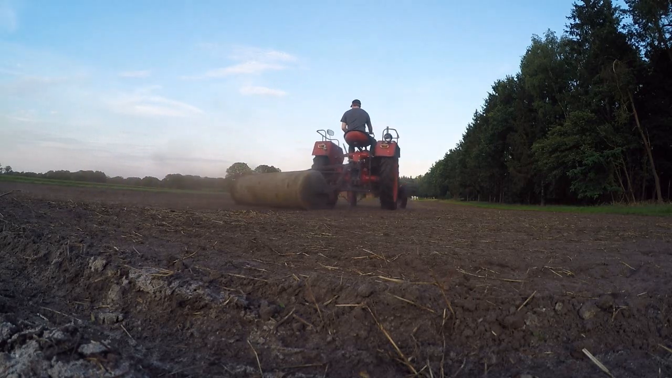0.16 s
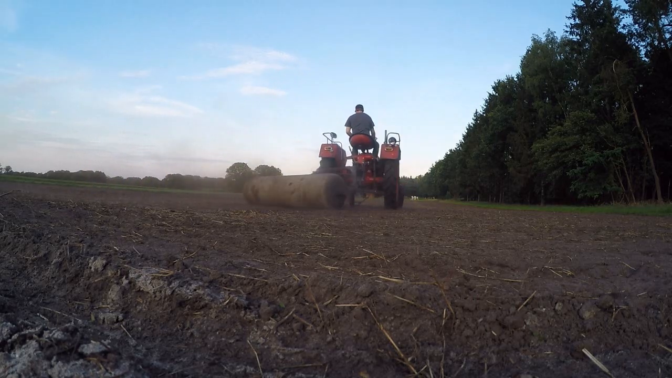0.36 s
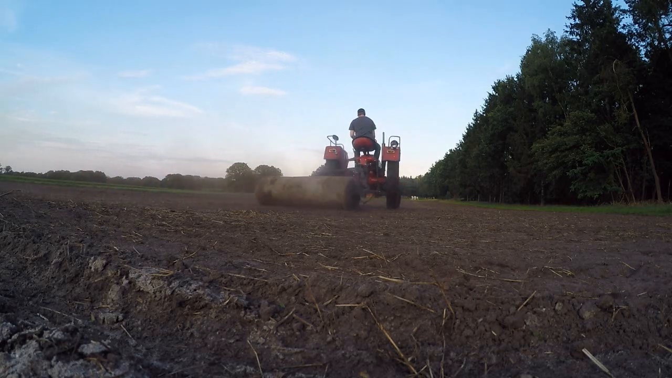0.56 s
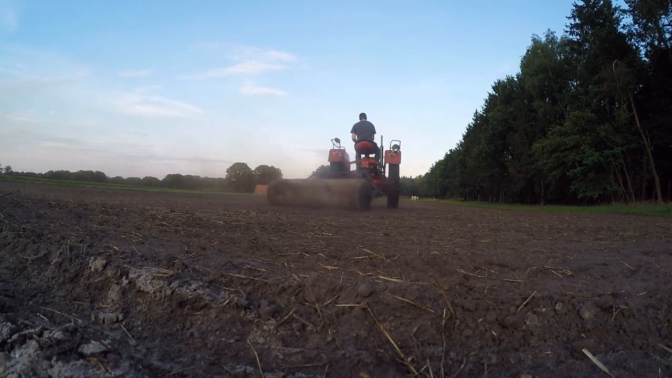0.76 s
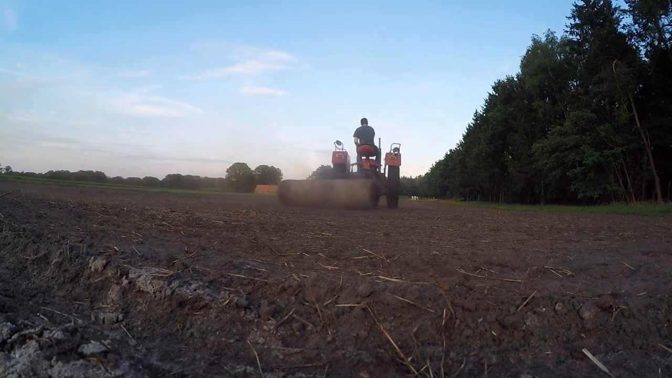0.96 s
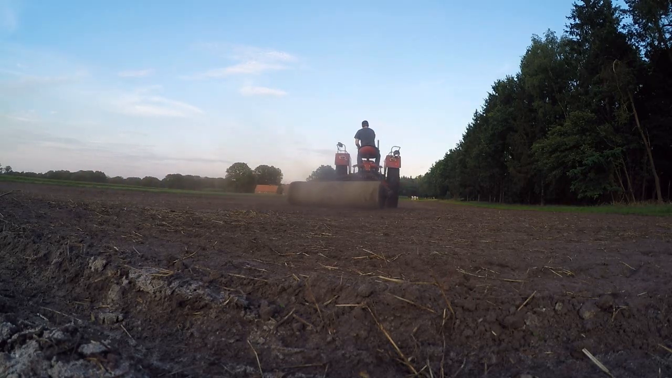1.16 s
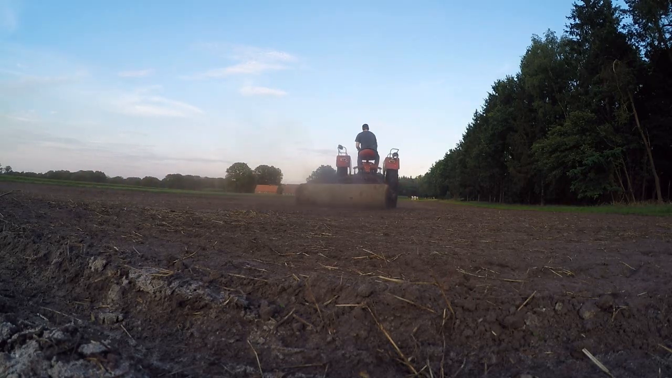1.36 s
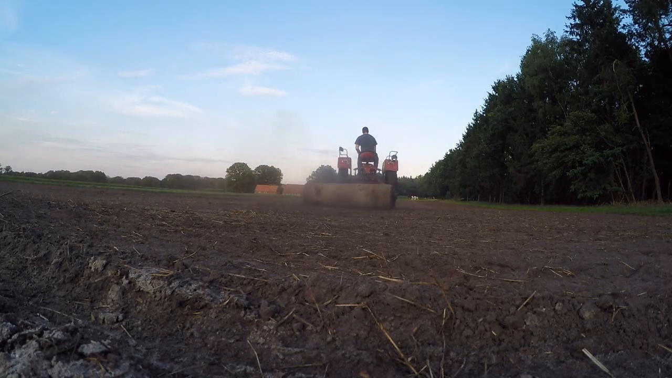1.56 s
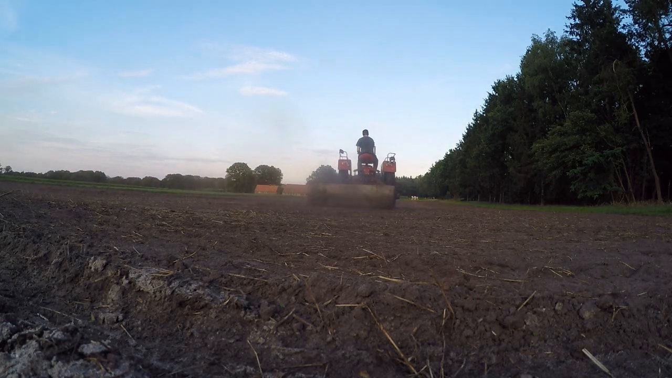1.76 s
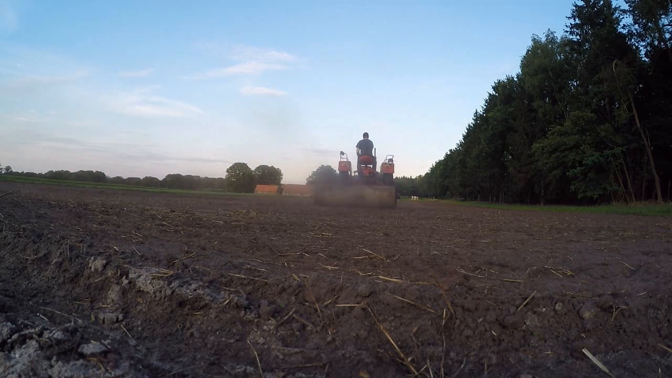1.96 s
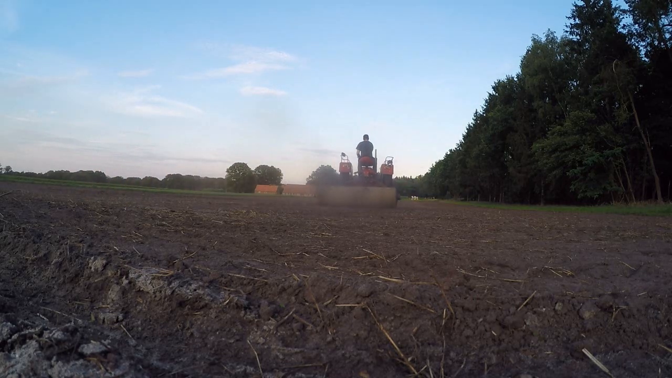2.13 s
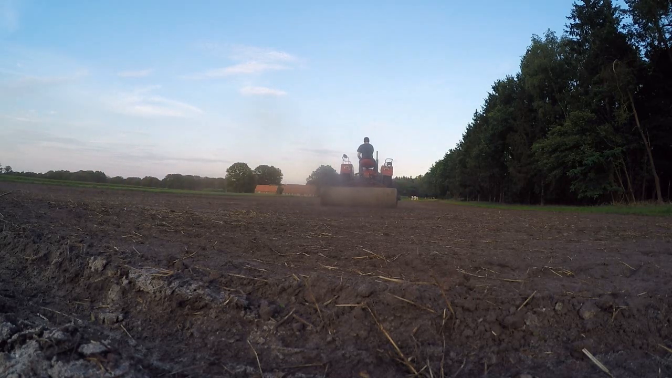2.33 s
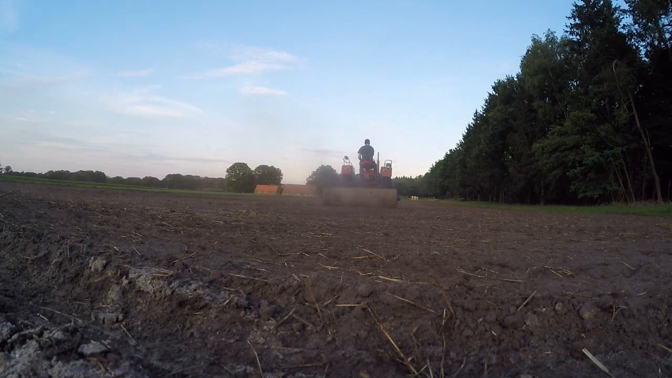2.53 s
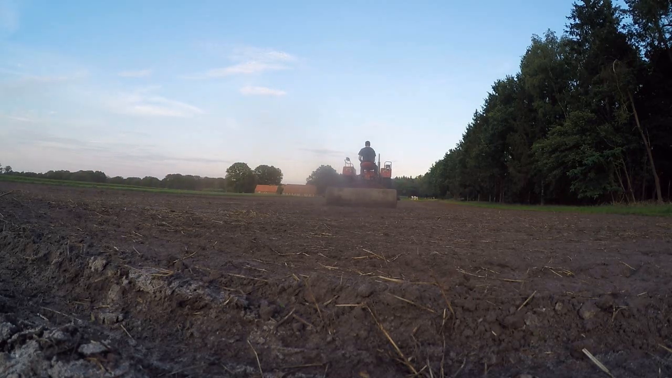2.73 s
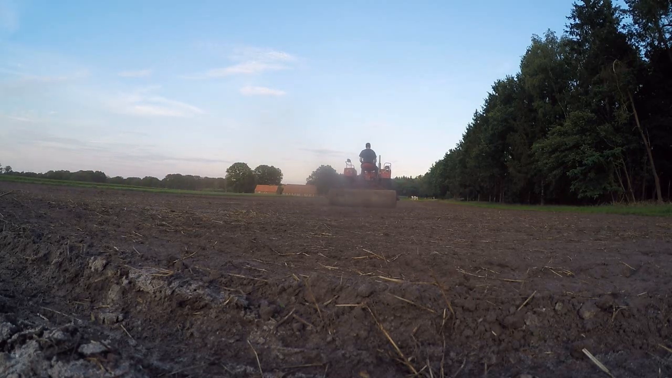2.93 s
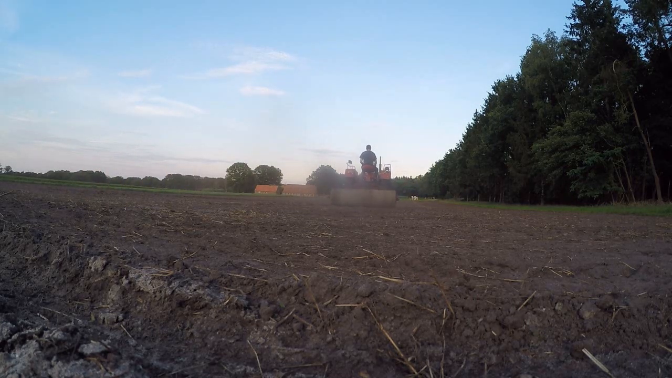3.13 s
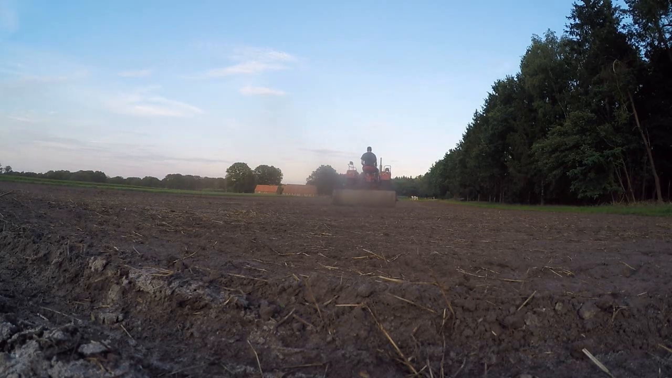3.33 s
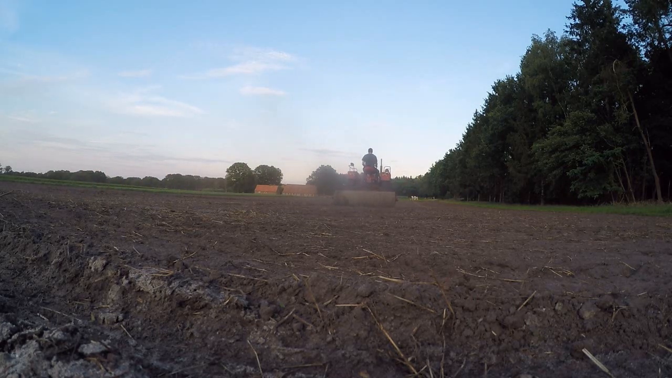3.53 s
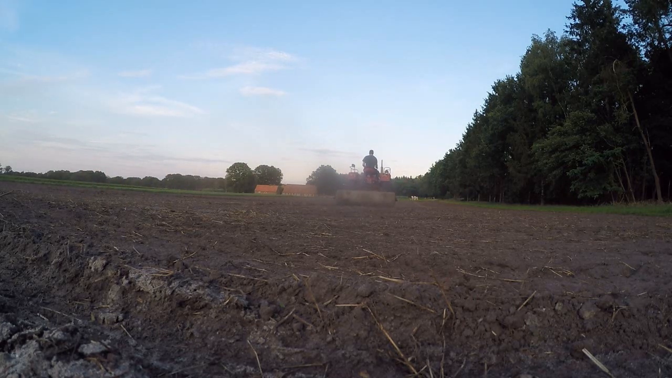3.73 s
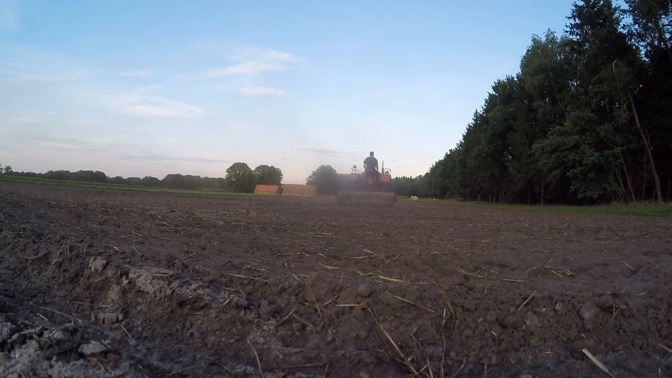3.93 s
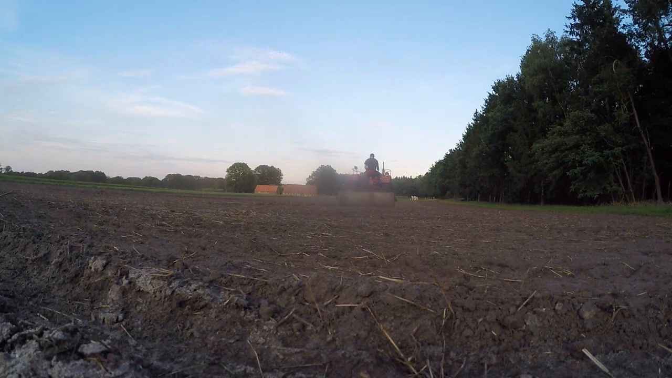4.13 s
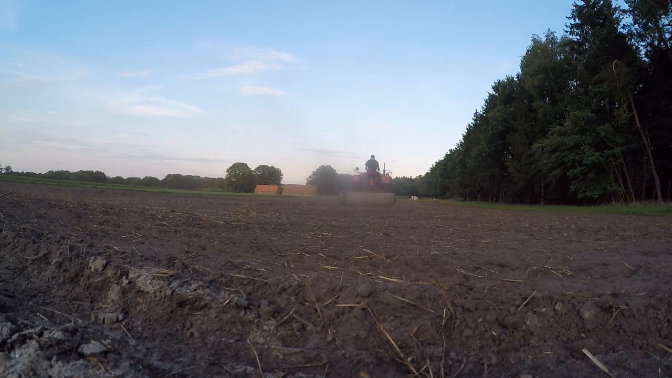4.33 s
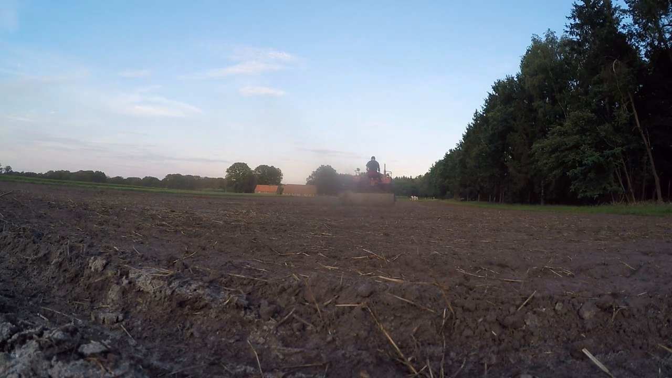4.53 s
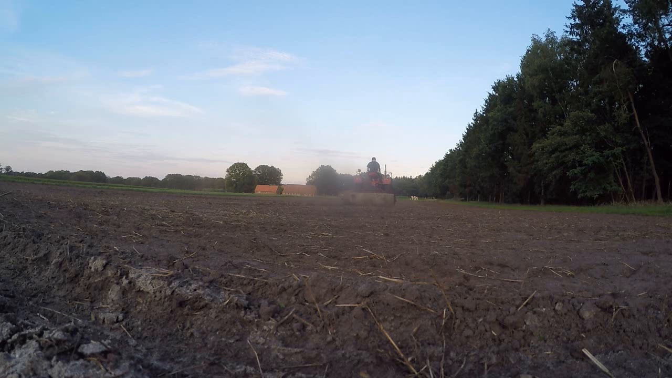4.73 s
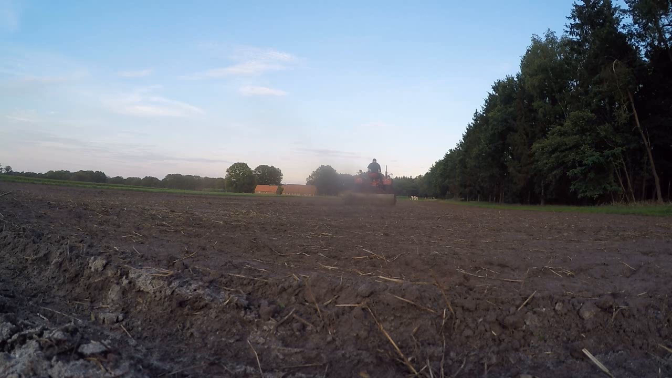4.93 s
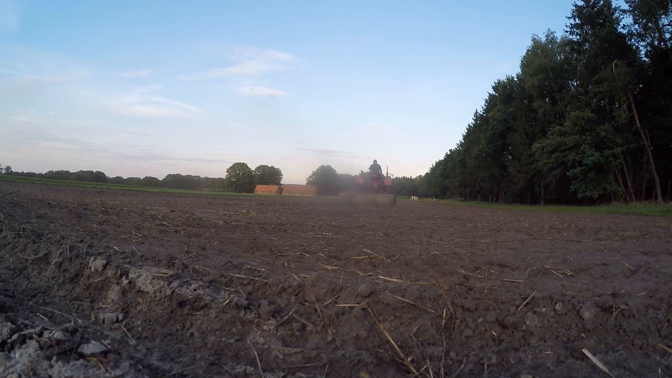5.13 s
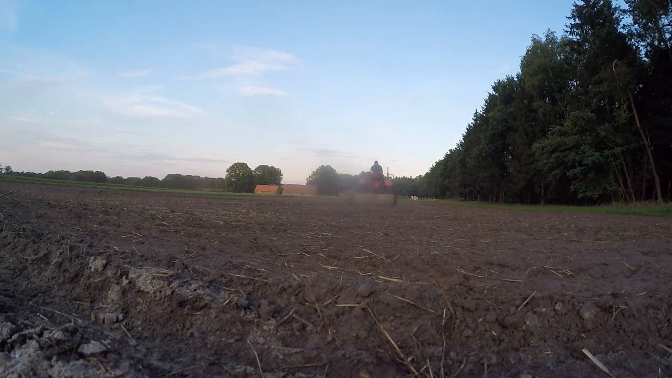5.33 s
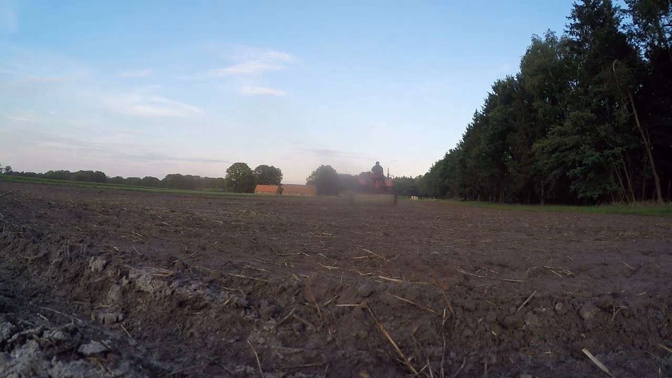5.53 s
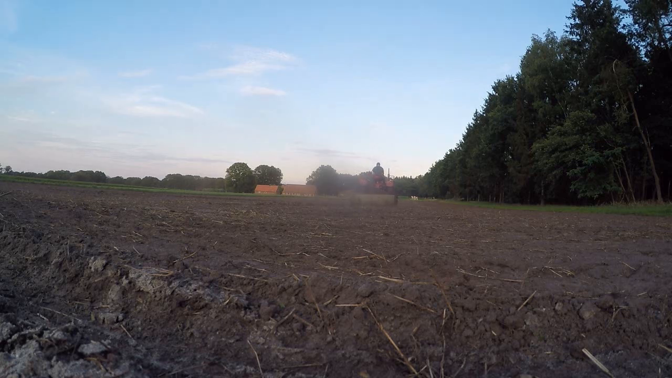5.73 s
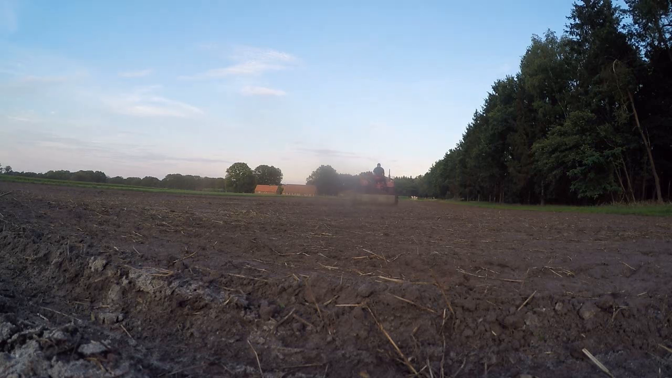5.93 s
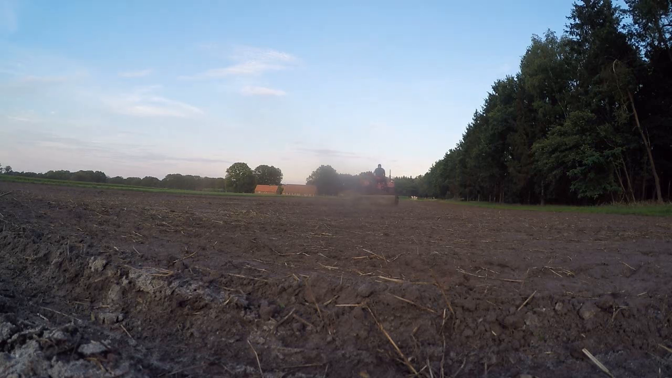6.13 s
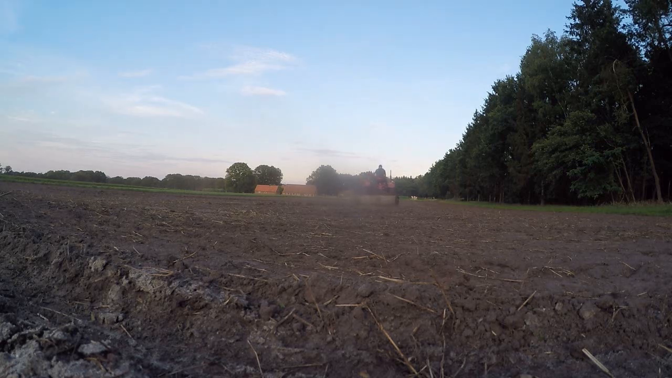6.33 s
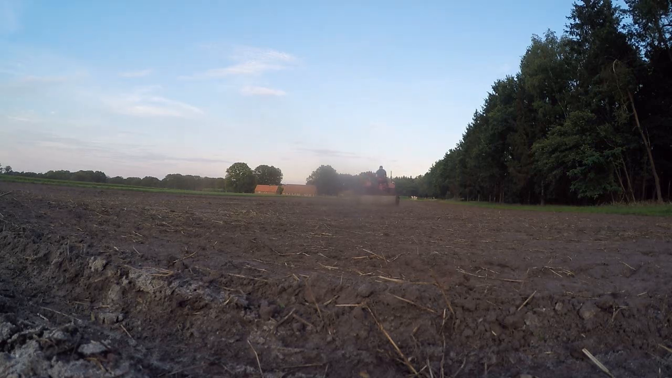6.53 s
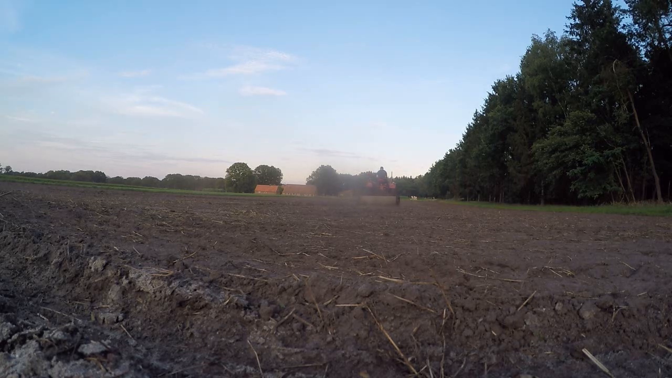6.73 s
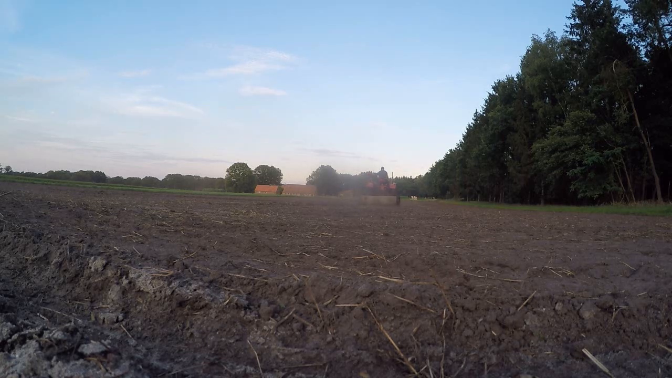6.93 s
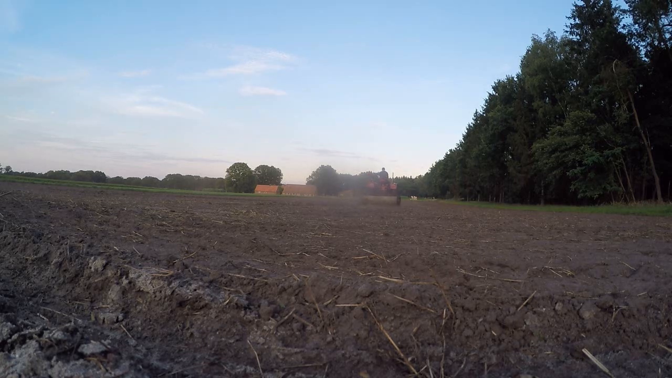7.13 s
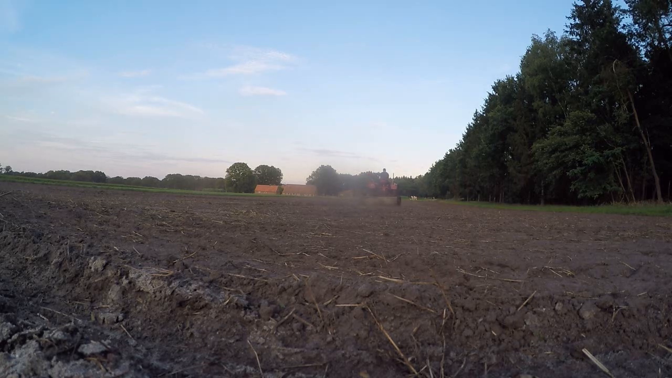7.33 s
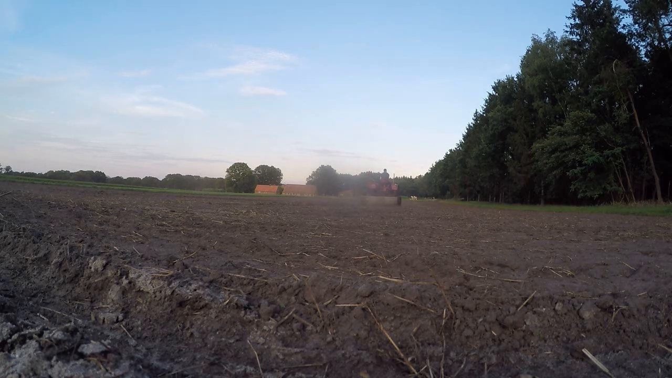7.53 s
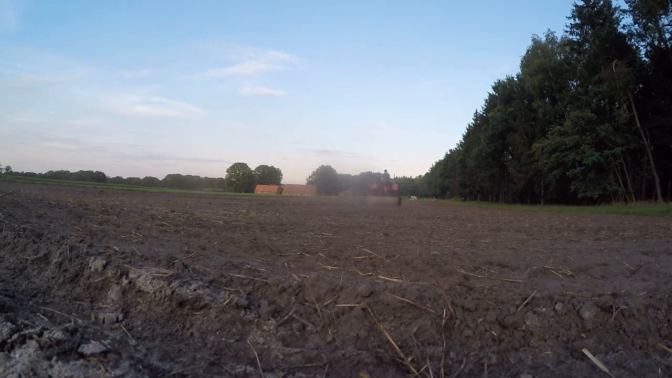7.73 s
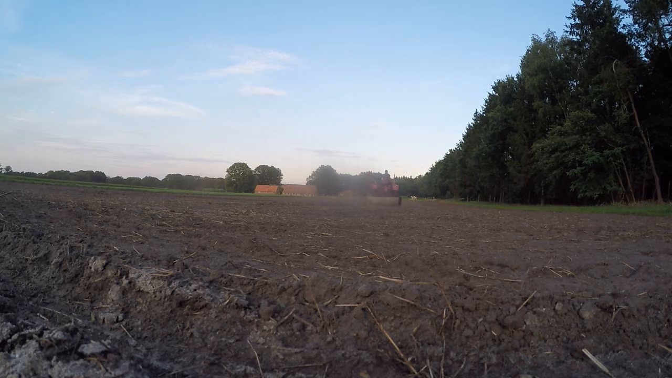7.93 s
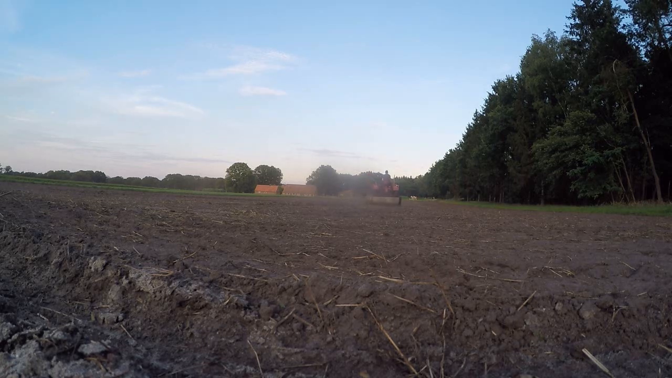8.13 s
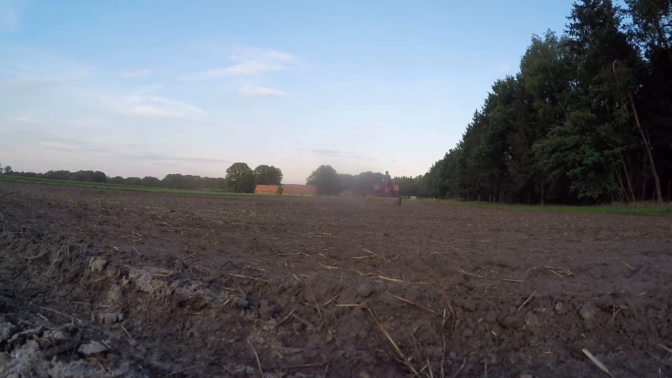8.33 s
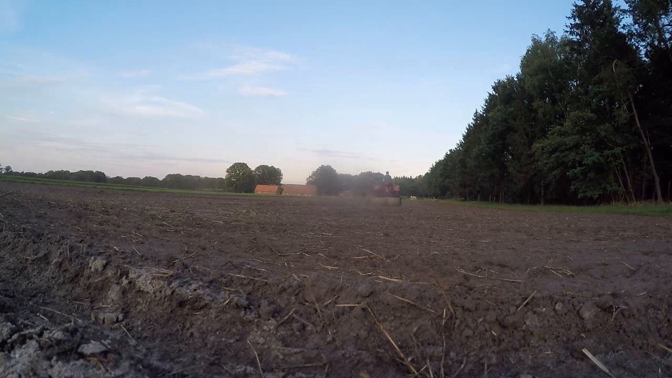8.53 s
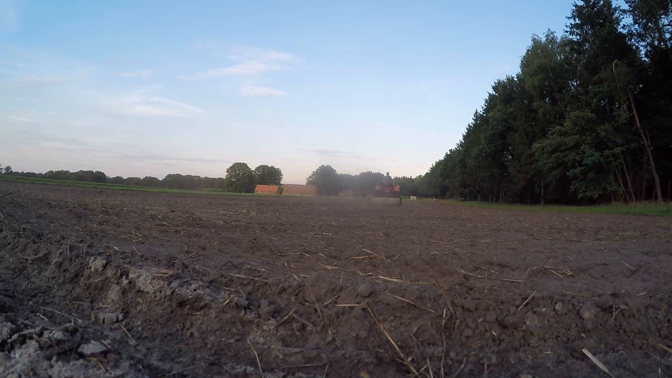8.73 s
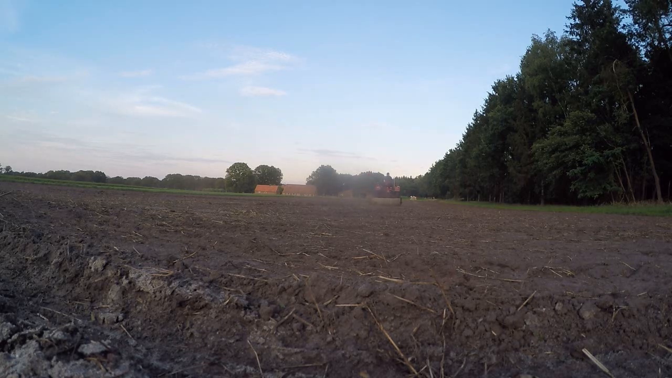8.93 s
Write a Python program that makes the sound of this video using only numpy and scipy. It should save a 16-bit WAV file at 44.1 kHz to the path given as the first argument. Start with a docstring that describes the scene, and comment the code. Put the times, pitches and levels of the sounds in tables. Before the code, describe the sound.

An old two-cylinder diesel tractor drives straight away over a dry field, starting a few metres from a fixed outdoor microphone. Deep exhaust thumps come in limping pairs, about eleven pairs a second, with metallic knocking and valve clatter. A roller rumbles and crunches clods behind it, scraping briefly at the start and after about a second and a half. Everything fades gradually; a tiny squeak comes late.

```python
"""Old diesel tractor pulling a roller away

A two-cylinder diesel tractor drags a roller away over a dry field. Its cylinders fire half a turn apart and
then rest, so gas pulses thump in limping pairs through the silencer, while impacts ring block and valve gear.
Filtered noise makes the roller rumble, hum and crunch; it scrapes twice and its bearing squeaks once on two tones.
Engine, rumble and crunch fade with distance, an echo off the soil colours the treble, and a faint wash stays.
"""
import sys
import numpy as np
from scipy import signal
from scipy.fft import rfft, irfft, next_fast_len
from scipy.io import wavfile
from scipy.ndimage import map_coordinates

SR = 44100
rng = np.random.default_rng(int(sys.argv[2]) if len(sys.argv) > 2 else 0)


def log_audio(samples):
    """Write samples as a 16-bit WAV file to the path given in sys.argv[1]."""
    # one column per channel
    frames = np.atleast_2d(samples).T
    # limit to full scale, then quantise
    limited = np.clip(frames, -1, 1)
    pcm = np.round(limited * 32767).astype(np.int16)
    wavfile.write(sys.argv[1], SR, pcm)


N = 395577
TIME = np.arange(N) / SR
START_M, DRIVE_M_PER_S = 7.66, 1.713   # the tractor drives straight away


def from_db(db):
    """Decibels to gain."""
    return 10 ** (np.asarray(db) / 20)


def rms_one(x):
    """Scale to unit rms."""
    return x / np.sqrt(np.mean(x ** 2) + 1e-20)


def drift(rate):
    """Random wander of rms 1 through `rate` knots per second; after 4000 knots it holds its last value."""
    knots = rng.standard_normal(4000)
    return rms_one(np.interp(TIME * rate, np.arange(len(knots)), knots))


def bell(at_s, width_s):
    """A smooth swell of height 1 around a moment."""
    return np.exp(-((TIME - at_s) / width_s) ** 2)


def coloured(x, spectrum):
    """Give a flat signal a spectrum that falls 40 dB per octave more beyond its ends; rms 1."""
    size = next_fast_len(N)
    octave = np.log2(np.maximum(np.arange(size // 2 + 1) * SR / size, 1))
    hz, level_db = np.transpose(spectrum)
    corners = np.log2(hz)
    beyond = np.abs(octave - np.clip(octave, corners[0], corners[-1]))
    gain = from_db(np.interp(octave, corners, level_db) - 40 * beyond)
    return rms_one(irfft(rfft(x, size) * gain, size)[:N])


def noise(spectrum):
    """Coloured noise of rms 1."""
    return coloured(rng.standard_normal(N), spectrum)


def resonate(x, modes, polarity=None):
    """Parallel two-pole resonances, alternating in sign unless a polarity is given; rms 1."""
    out = 0
    for k, (hz, width_hz, db) in enumerate(modes):
        sign = polarity[k] if polarity else (-1) ** k
        r = np.exp(-np.pi * width_hz / SR)
        gain = sign * from_db(db) * (1 - r * r) / 2
        poles = [1, -2 * r * np.cos(2 * np.pi * hz / SR), r * r]
        out = out + signal.lfilter([gain, 0, -gain], poles, x + 1e-18)
    return rms_one(out)


def cut(x, hz, kind):
    """Second-order high- or low-pass."""
    return signal.sosfilt(signal.butter(2, hz, kind, fs=SR, output="sos"), x)


def each_cycle(crank, place, uneven_db, jitter_s):
    """One click whenever the crank passes a place in its cycle, with random level and timing errors."""
    cycles = np.arange(-1, int(crank[-1]) + 1)
    chance = rng.standard_normal((len(cycles), 2))
    moment_s = np.interp(cycles + place, crank, TIME, left=-1, right=-1) + jitter_s * chance[:, 0]
    at = np.round(moment_s * SR).astype(int)
    heard = (at >= 0) & (at < N)
    clicks = np.zeros(N)
    clicks[at[heard]] = from_db(uneven_db * chance[heard, 1])
    return clicks


def burst(clicks, peak_s):
    """Each click swells to a peak of its own height and dies away."""
    r = np.exp(-1 / (peak_s * SR))
    return signal.lfilter([0, np.e / (peak_s * SR)], [1, -2 * r, r * r], clicks + 1e-18)


def shower(crank, alike):
    """A dense shower of impacts, with a share `alike` of its power repeating in every cycle."""
    since_s = TIME - np.interp(np.floor(crank), crank, TIME)
    pattern = rng.standard_normal(SR)[(since_s * SR).astype(int)]
    return np.sqrt(alike) * pattern + np.sqrt(1 - alike) * rng.standard_normal(N)


def distance():
    """Metres from the microphone to the tractor."""
    return START_M + DRIVE_M_PER_S * TIME


def carried(start_db, doubling_db, flank_db, facing_s, hidden_db):
    """Level in dB: falls with distance, shifts as a part faces the microphone or the roller hides the engine."""
    fall_db = doubling_db * np.log2(distance() / START_M)
    facing_db = flank_db * bell(facing_s, width_s=0.5)
    # the roller swings in front of the engine for a moment; a negative dip lifts the part
    hiding_db = hidden_db * bell(1.64, width_s=.4)
    return start_db - fall_db + facing_db - hiding_db


# engine speed: t/s, four-stroke cycles/(1/s)
ENGINE_SPEED = [(0.0, 11.474), (0.39, 11.365), (1.64, 11.664), (1.94, 11.454), (3.09, 11.693),
                (3.71, 11.531), (4.33, 11.479), (4.73, 11.263), (6.15, 11.049), (6.46, 11.12),
                (7.21, 11.005), (7.81, 11.114), (8.06, 11.026), (8.97, 11.332)]


def crankshaft():
    """The speed adds up to the crank's place, counted in four-stroke cycles; the first starts at 0.01775 s."""
    s, cycles_per_s = np.transpose(ENGINE_SPEED)
    speed = np.interp(TIME, s, cycles_per_s)
    return np.cumsum(speed) / SR - .01775 * speed[0]


# gas strokes, two exhaust blasts, a weak suction and a weak afterpuff: place/cycle, relative level/dB
GAS_STROKES = [(-.011, 0), (.237, -6.8), (.592, -18.9), (.801, -16.1)]
# sign of each gas stroke's pulse, one per stroke: sign/1
FLOW_SIGNS = [1, 1, -1, 1]
# silencer resonances: f/Hz, width/Hz, relative level/dB
SILENCER_MODES = [(38.3, 3.65, 1.5), (50.9, 14.7, -3), (82.1, 14.1, -6.5), (89, 30, -8),
                  (134.2, 7.4, -19.5), (168.7, 22.1, -14), (174.53, 4.74, -9.5)]
# sign of each silencer resonance, one per mode: sign/1
SILENCER_SIGNS = [-1, 1, 1, -1, 1, -1, 1]
# overtones of the exhaust stack: f/Hz, width/Hz, relative level/dB
STACK_MODES = [(240, 26, -6.5), (319.8, 6, 1), (378, 20.4, 1), (487, 21, -3.5), (605.5, 7.4, 0),
               (798, 10.5, -7), (939, 23, -12)]
# exhaust carry: start level/dB, fall/(dB per doubling), facing lift/dB, facing t/s, hidden dip/dB
EXHAUST_LEVEL = (-15, 6, .3, .5, .3)


def exhaust(crank, stack_db=-31, puff_db=-34):
    """Paired gas pulses boom in the silencer, ring the stack and leave a rough puff."""
    pulses = 0
    for sign, (place, db) in zip(FLOW_SIGNS, GAS_STROKES):
        pulses = pulses + sign * from_db(db) * each_cycle(crank, place, uneven_db=0.15, jitter_s=.0001)
    boom = cut(resonate(pulses, SILENCER_MODES, SILENCER_SIGNS), hz=30, kind="high")
    # two chambers in a row round off each blast
    boom = rms_one(cut(cut(boom, hz=200, kind="low"), hz=200, kind="low"))
    stack = resonate(pulses, STACK_MODES)
    puff = resonate(burst(pulses, peak_s=0.0076) * rng.standard_normal(N), STACK_MODES)
    return from_db(carried(*EXHAUST_LEVEL)) * (boom + from_db(stack_db) * stack + from_db(puff_db) * puff)


# barks of the blasts in the tailpipe: place/cycle, f/Hz, width/Hz, relative level/dB
TAILPIPE_BARKS = [(0.03, 176, 17.4, -1), (.29, 165.6, 16.6, 0), (.3, 490, 140, -13.5), (.03, 238, 54, -14)]
# bark carry: start level/dB, fall/(dB per doubling), facing lift/dB, facing t/s, hidden dip/dB
BARK_LEVEL = (-38.5, 7, 2, -0.8, -0.5)


def barks(crank):
    """Both blasts give the tailpipe a short, uneven bark."""
    rings = 0
    for place, hz, width_hz, db in TAILPIPE_BARKS:
        blows = each_cycle(crank, place, uneven_db=0.5, jitter_s=.0006)
        rings = rings + from_db(db) * resonate(blows, [(hz, width_hz, 0)])
    return from_db(carried(*BARK_LEVEL)) * rms_one(rings)


# knocks and valve closings of one cycle: place/cycle, time to peak t/s, then relative levels:
# block ring/dB, clatter/dB, valve gear/dB, ticks/dB
CYCLE_CONTACTS = [(0.024, 0.0019, 3, -13, 1, -7), (.063, 0.0029, 4, -5, 2.5, -1),
                  (.17, 0.0015, -22, -16, -18.5, -16), (.268, 0.0051, -24, -32, -15, 0.5),
                  (.49, 0.0042, -17, -0.5, -6, 5), (.768, 0.0046, -29, -0.5, 0.5, 3),
                  (.83, 0.0039, -13, 1, -3.5, -19)]
# ringing of the engine block and its covers: f/Hz, width/Hz, relative level/dB
BLOCK_MODES = [(1260, 23, -15), (1730, 110, -4.5), (2627, 81, -2), (3180, 56, 8), (4400, 18, -10)]
# clatter spectrum: f/Hz, relative density level/dB
CLATTER_COLOUR = [(560, -15), (950, -1.5), (1180, -12), (1290, 5.5), (1420, -2), (1760, 1), (2150, -3.5),
                  (2950, -10.5), (3170, -3.5), (3420, -6.5), (4200, -7), (5460, -44), (9240, -120)]
# valve gear spectrum: f/Hz, relative density level/dB
VALVE_COLOUR = [(2180, -59), (3700, -2), (4770, 2), (5540, -1), (5870, -3.5), (6650, -4), (8330, -16.5),
                (9050, -15), (10000, -19.5), (13000, -44), (22000, -120)]
# tick spectrum: f/Hz, relative density level/dB
TICK_COLOUR = [(5500, -20), (7500, 2), (9500, -2.5), (12000, -4), (15000, -10.5)]
# clatter carry, before trim: start level/dB, fall/(dB per doubling), facing lift/dB, facing t/s, hidden dip/dB
CLATTER_LEVEL = (-41, 8.5, 1, 0.5, 2.5)
# valve carry, before trim: start level/dB, fall/(dB per doubling), facing lift/dB, facing t/s, hidden dip/dB
VALVE_LEVEL = (-42, 11.5, -1, -4, .5)
# tick carry, before trim: start level/dB, fall/(dB per doubling), facing lift/dB, facing t/s, hidden dip/dB
TICK_LEVEL = (-59.5, 6.5, 7, -0.7, 3)


def mechanics(crank, block_trim_db=-14, clatter_trim_db=-2.5, valve_trim_db=1.5, tick_trim_db=2.5):
    """Every contact is a short shower of impacts that rings the block and rattles the covers and valve gear."""
    power = 0
    for place, peak_s, *shares_db in CYCLE_CONTACTS:
        blow = burst(each_cycle(crank, place, uneven_db=1.43, jitter_s=0.00055), peak_s)
        power = power + np.outer(from_db(shares_db) ** 2, blow ** 2)
    # the timing gears keep up a steady rush between the contacts
    rush = from_db([-27, -2.5, -9.0, -5.0])[:, None]
    ring_env, clatter_env, valve_env, tick_env = [rms_one(np.sqrt(p)) for p in power + rush ** 2]
    # rough level flutter that freezes after about 4.4 s, when the drift runs out of knots
    grain = rms_one(from_db(0.84 * drift(rate=900)))
    block = resonate(ring_env * shower(crank, alike=0.42), BLOCK_MODES)
    clatter = clatter_env * grain * coloured(shower(crank, alike=0.69), CLATTER_COLOUR)
    covers = from_db(block_trim_db) * block + from_db(clatter_trim_db) * clatter
    valves = grain * valve_env * coloured(shower(crank, alike=0.5), VALVE_COLOUR)
    ticks = grain * tick_env * noise(TICK_COLOUR)
    return (from_db(carried(*CLATTER_LEVEL)) * covers
            + from_db(carried(*VALVE_LEVEL) + valve_trim_db) * valves
            + from_db(carried(*TICK_LEVEL) + tick_trim_db) * ticks)


# covers that ring clearly when struck: place of the blow/cycle, f/Hz, width/Hz, relative level/dB,
# further fall in the balance/(dB per doubling of distance)
COVER_KNOCKS = [(0, 1770, 59, 3.5, 4), (.09, 1700, 100, -0.5, 0), (.05, 3200, 29, -1, -1.5),
                (.1, 2700, 37, -11.5, -5), (0.1, 1290, 12, -4.5, 1), (.8, 1100, 22, -12.5, -4.5),
                (0.01, 4430, 31, -2, 3.5), (.8, 2690, 24, -4.5, -1), (.78, 5140, 32, -3.5, 2.5),
                (.8, 4700, 29, -1, 5), (.03, 5560, 24, -4, 3.5), (.3, 800, 22, -4, 3),
                (.55, 8750, 30, -19, -4)]
# knock carry: start level/dB, fall/(dB per doubling), facing lift/dB, facing t/s, hidden dip/dB
KNOCK_LEVEL = (-43, 10, 4, 2.2, 7.5)


def knocks(crank):
    """Each cover is struck once a cycle and rings on its own pitch; some carry farther than others."""
    rings = 0
    for place, hz, width_hz, db, loss_db in COVER_KNOCKS:
        blows = each_cycle(crank, place, uneven_db=2.1, jitter_s=.0004)
        level_db = db - loss_db * np.log2(distance() / START_M)
        rings = rings + from_db(level_db) * resonate(blows, [(hz, width_hz, 0)])
    return from_db(carried(*KNOCK_LEVEL)) * rms_one(rings)


# spectrum shared by chassis growl and roller rumble: f/Hz, relative density level/dB
RUMBLE_COLOUR = [(130, 7), (215, -4.5), (322, 1), (366, -3), (458, 1), (556, -7), (610, -5.5), (926, -10),
                 (1020, -19.5), (1200, -19), (1560, -51), (2640, -120)]
# their carry, before trim: start level/dB, fall/(dB per doubling), facing lift/dB, facing t/s, hidden dip/dB
RUMBLE_LEVEL = (-33, 11, 3, 0.3, 0)


def growl(crank, trim_db=-4.5):
    """The chassis shakes in step with the engine."""
    return from_db(carried(*RUMBLE_LEVEL) + trim_db) * coloured(shower(crank, alike=0.93), RUMBLE_COLOUR)


def roller_rumble(trim_db=-5, lumpy_db=-0.2):
    """The roller rumbles over uneven soil: low noise with a slightly wandering level."""
    level_db = carried(*RUMBLE_LEVEL) + trim_db + lumpy_db * drift(rate=30)
    return from_db(level_db) * noise(RUMBLE_COLOUR)


# spectrum of crushed clods: f/Hz, relative density level/dB
CRUNCH_COLOUR = [(400, -8), (800, 3.5), (1500, -4.5), (3000, 1.5), (5500, -6), (8000, -17), (14000, -31)]
# clod carry: start level/dB, fall/(dB per doubling), facing lift/dB, facing t/s, hidden dip/dB
CLOD_LEVEL = (-41, 10, 2.5, 0.36, -1)


def crunch(grains_per_s=3500, grain_spread_db=2.0, lumpy_db=-0.2):
    """The roller crushes dry clods into crackling grains: random clicks of random sign and height."""
    struck = rng.random(N) < grains_per_s / SR
    height_db = grain_spread_db * np.minimum(rng.exponential(1, N), 4)
    grains = struck * rng.choice([-1, 1], N) * from_db(height_db)
    return from_db(carried(*CLOD_LEVEL) + lumpy_db * drift(rate=33)) * coloured(grains, CRUNCH_COLOUR)


# swells of the hollow drum's hum: t/s, length t/s, level/dB
HUM_SWELLS = [(0.095, .8, -46), (5.027, .2, -49), (5.705, 0.3, -48), (6.2, 0.43, -56.5), (6.868, .35, -52),
              (7.55, 0.67, -52.5), (8.16, 0.5, -57.5)]
# resonances of the drum: f/Hz, width/Hz, relative level/dB
HUM_MODES = [(322.2, 7.4, 2.5), (456, 21, -8.5)]


def drum_hum(rest_db=-61):
    """The hollow drum of the roller resonates to noise and hums up in swells above a faint rest level."""
    swells = from_db(rest_db)
    for s, length_s, db in HUM_SWELLS:
        swells = swells + from_db(db) * bell(s, length_s / 2)
    return swells * resonate(rng.standard_normal(N), HUM_MODES)


# diffuse engine wash: f/Hz, relative density level/dB
WASH_COLOUR = [(25, 3), (60, -2), (125, 3.5), (170, -3.5), (230, -2), (300, -12), (900, -21.5), (1400, -16),
               (2100, -22.5), (2700, -18), (4300, -24.5), (7000, -27.5), (11000, -41.5)]


def forest_wash(level_db=-48):
    """Steady noise stands for the engine's diffuse wash, scattered back by the forest edge."""
    return from_db(level_db) * noise(WASH_COLOUR)


# scrapes over hard lumps: t/s, attack t/s, release t/s, level/dB
LUMP_SCRAPES = [(.045, 0.0052, .008, -31.5), (1.42, 0.021, 0.016, -35.5)]
# scrape spectrum: f/Hz, relative density level/dB
SCRAPE_SPECTRUM = [(300, -6.5), (900, 3), (3000, 3), (5000, -11), (9000, -27)]


def scrapes():
    """The roller scrapes over hard lumps in short bursts of coloured noise."""
    swells = 0
    for s, attack_s, release_s, db in LUMP_SCRAPES:
        swells = swells + from_db(db) * bell(s, np.where(TIME < s, attack_s, release_s))
    return swells * noise(SCRAPE_SPECTRUM)


# tones of the roller's bearing, before trim: f/Hz, level/dB
SQUEAK_TONES = [(6535, -59), (7079, -68)]


def squeak(start_s=6.675, length_s=0.075, trim_db=1):
    """A dry bearing sings for a moment on two wavering tones."""
    swell = np.sqrt(np.abs(np.sin(np.pi * np.clip((TIME - start_s) / length_s, 0, 1))))
    tones = 0
    for hz, db in SQUEAK_TONES:
        wavering_hz = hz * (1 + 0.0042 * drift(rate=190))
        tones = tones + from_db(db) * np.sin(2 * np.pi * np.cumsum(wavering_hz) / SR)
    return from_db(trim_db) * np.sqrt(2) * swell * tones


def over_ground(x, reflection=0.34, notch_start_hz=7840, notch_doubling_s=4.3):
    """The soil echo lags less as the tractor recedes, so the notch where it weakens the direct sound climbs."""
    notch_hz = notch_start_hz * 2 ** (TIME / notch_doubling_s)
    lag = SR / (2 * notch_hz)   # half a period, in samples
    echo = map_coordinates(x, [np.arange(N) - lag], order=3, mode="nearest")
    return (x + reflection * echo) / (1 + reflection)


def scene():
    """The crank drives the tractor; the roller trails behind, both over soil, and the trees return a faint wash."""
    crank = crankshaft()
    tractor = exhaust(crank) + barks(crank) + mechanics(crank) + knocks(crank) + growl(crank)
    roller = roller_rumble() + crunch() + drum_hum() + scrapes() + squeak()
    return (over_ground(tractor + roller) + forest_wash())[None]


def record(dry):
    """A steep elliptic low-pass cuts the top above 15250 Hz."""
    return signal.sosfilt(signal.ellip(12, .1, 90, 15250, fs=SR, output="sos"), dry)


dry = scene()
out = record(dry)
log_audio(out)
```